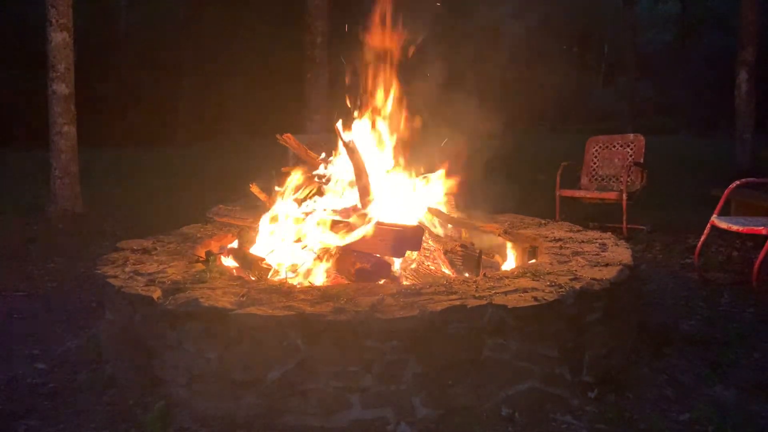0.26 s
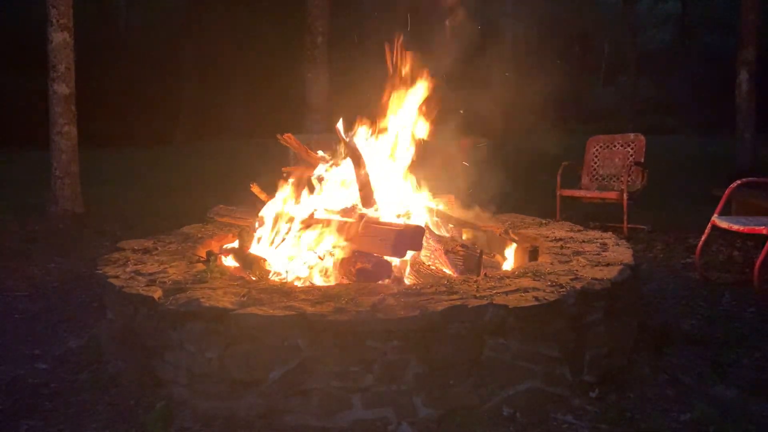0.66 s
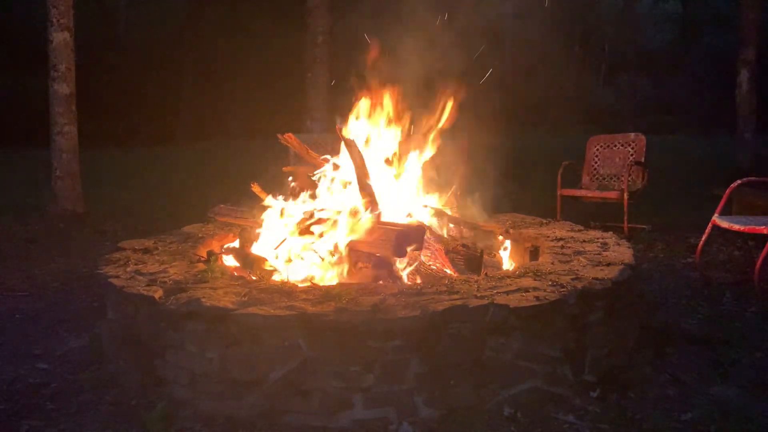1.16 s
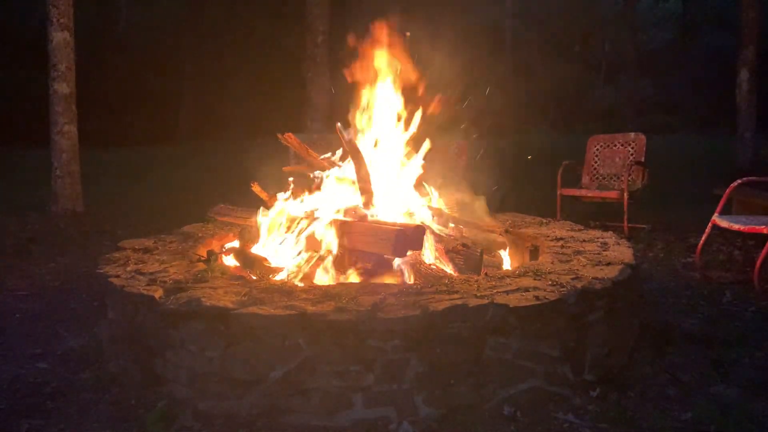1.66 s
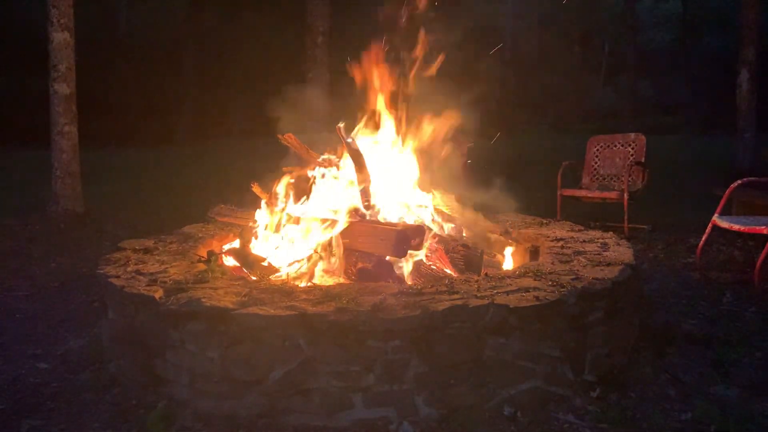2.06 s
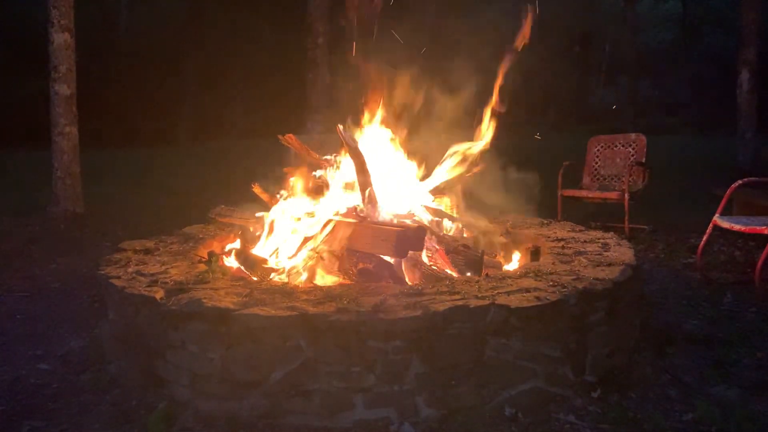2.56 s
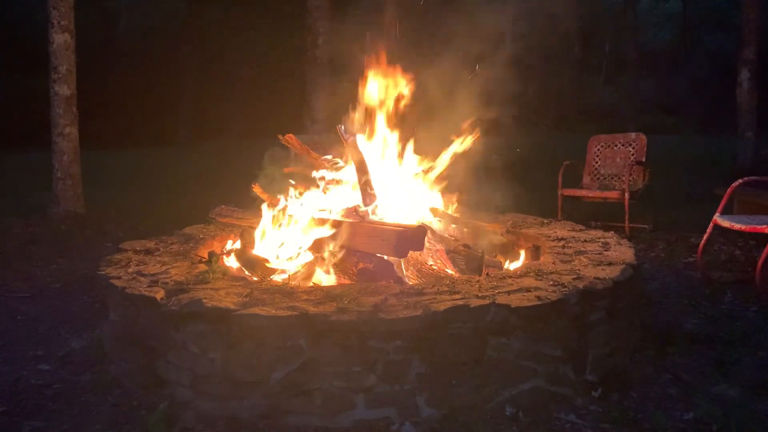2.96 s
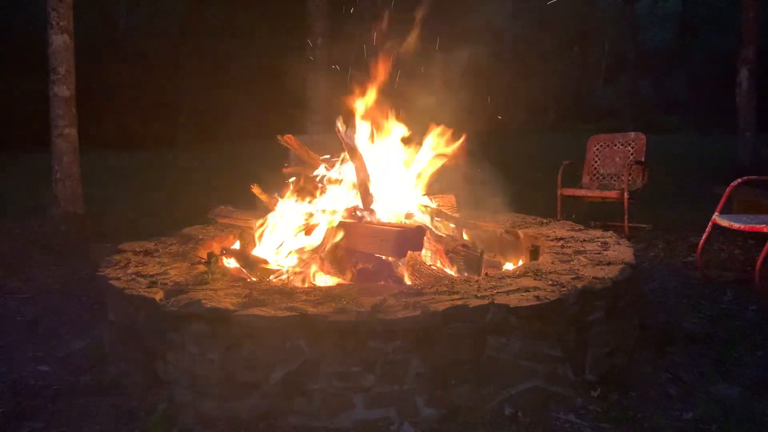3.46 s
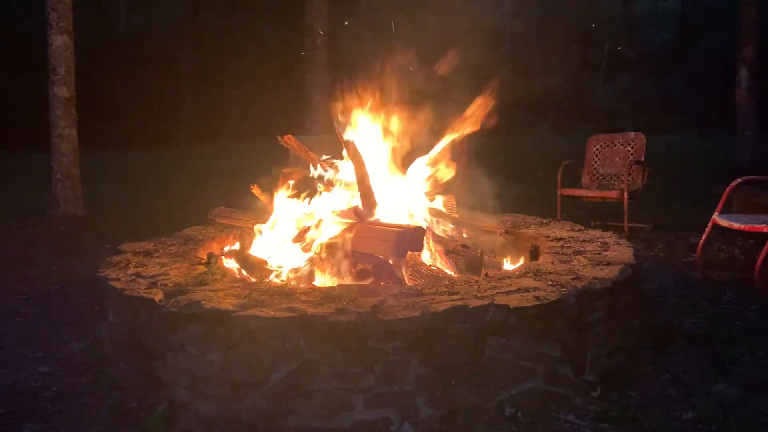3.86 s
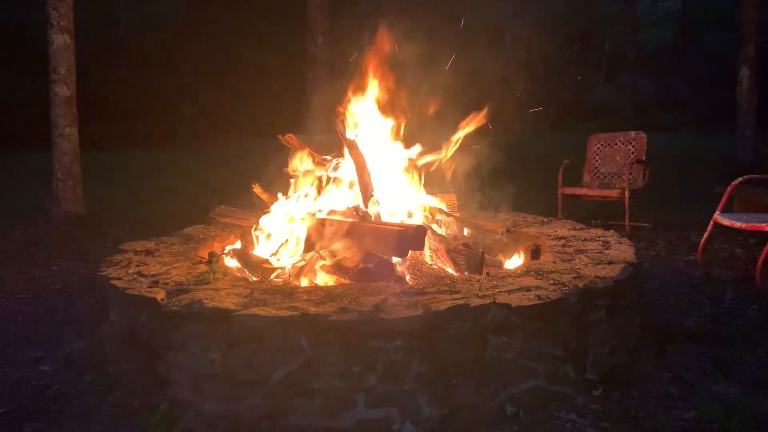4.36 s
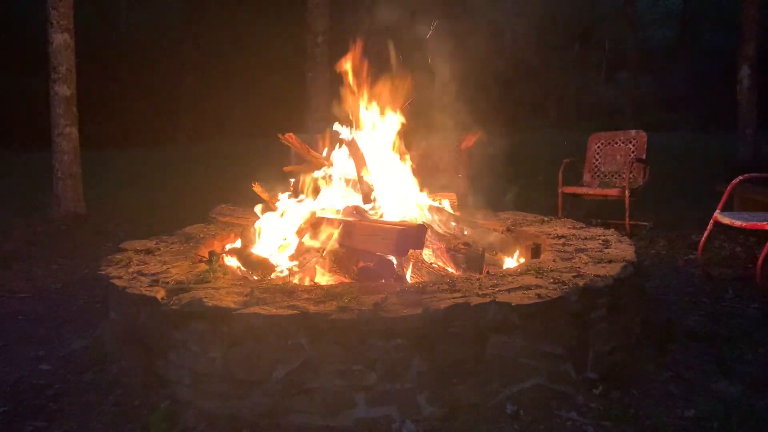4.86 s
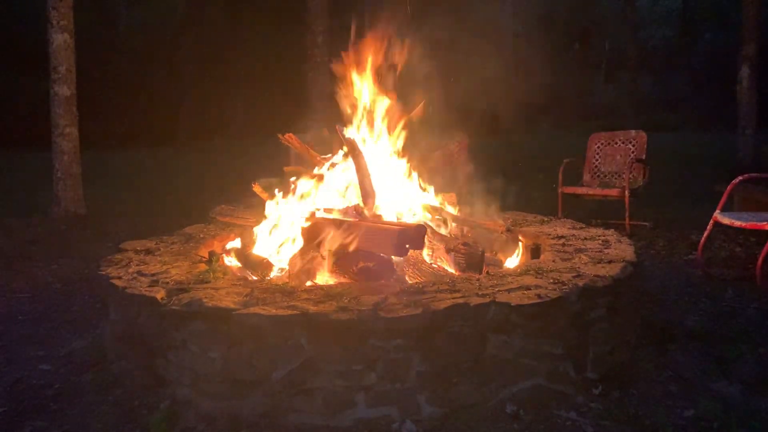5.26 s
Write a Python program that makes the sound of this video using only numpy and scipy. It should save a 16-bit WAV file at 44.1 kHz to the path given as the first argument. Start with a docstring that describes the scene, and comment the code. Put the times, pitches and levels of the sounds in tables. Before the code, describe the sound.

Outdoors at night, a log fire burns a few metres from a phone microphone. Short bright cracks with small woody knocks come irregularly, many per second, among fine ticking embers. Flames flutter softly and low, sap hisses faintly, and a thin steady cricket chorus trills all around. The sound is dry and open, with only a slight scatter from stones and trunks.

```python
"""Wood fire at night

A wood fire burns a few metres from a phone, outdoors. Sap pockets burst as short bright cracks with a woody
knock: grainy noise bursts through log resonances. Embers tick and small splits answer, as fainter bursts.
The flames flutter low and sap hisses, both as filtered noise with wandering level. Crickets trill as pulsed,
wavering tones. Stones, ground and trunks scatter the bursts; two microphone ports pick up the fire."""
import sys
import numpy as np
from scipy import signal
from scipy.fft import rfft, irfft, next_fast_len
from scipy.io import wavfile
from scipy.ndimage import uniform_filter1d

SR = 44100
rng = np.random.default_rng(int(sys.argv[2]) if len(sys.argv) > 2 else 0)


def unload_audio(sound):
    """Save the sound as a 16-bit wav file, at the path given as the first command line argument."""
    columns = np.transpose(np.atleast_2d(sound))
    # keep every value between -1 and 1, then stretch to whole-number steps
    steps = np.round(np.clip(columns, -1, 1) * 32767)
    wavfile.write(sys.argv[1], SR, steps.astype(np.int16))


def ratio(d):
    """dB to gain"""
    e = np.asarray(d, float) / 20
    return 10 ** e


N = 243431
SIZE = next_fast_len(N + 8192)
HZ = np.arange(SIZE // 2 + 1) * SR / SIZE
TIME = np.arange(N) / SR

# bursting pockets, source levels as rms over 5 ms:
# (time [s], crack [dB], knock [dB], top band [dB], length [ms])
POCKETS = [(0.0439, -39.5, -54, -49, 0.59), (0.129, -45, -50.5, -32, 1.3), (0.1549, -32.5, -48, -46, 0.43),
           (0.2386, -39, -52, -52, 0.62), (0.2436, -46, -55, -60, 2.2), (0.253, -45, -63, -44, 1.1),
           (0.2663, -37.5, -57, -49, 1.4), (0.3233, -41, -63, -40, 0.8), (0.3274, -42, -48, -39, 3.3),
           (0.3358, -41.5, -69, -33, 0.65), (0.364, -37, -51.5, -49, 0.67), (0.4, -46, -59, -41, 2.7),
           (0.457, -26, -44.5, -27, 1.05), (0.4654, -37, -55, -41, 1.4), (0.5143, -43.5, -49, -38, 1.8),
           (0.6232, -48, -54, -47, 0.49), (0.6523, -44, -52, -42, 1.3), (0.673, -36.5, -46, -27, 0.43),
           (0.6975, -43, -50, -36, 1.2), (0.7047, -37, -48, -48, 0.84), (0.7404, -33.5, -55, -43, 1.1),
           (0.7755, -37, -56, -50, 2.7), (0.7814, -39, -58, -51, 1.3), (0.8048, -31.5, -50, -38, 2.1),
           (0.896, -43, -64, -48, 1.1), (0.931, -43, -54, -35, 0.49), (0.945, -35.5, -47, -34, 1.1),
           (0.9483, -46, -46.5, -45, 2.3), (0.9903, -37, -58, -39, 0.86), (1.0086, -34.5, -44, -40, 1.1),
           (1.0227, -33, -42.5, -22, 1.14), (1.0323, -37, -53, -50, 0.91), (1.0587, -41, -52, -47, 0.77),
           (1.0644, -47, -48, -56, 3.7), (1.069, -53, -68, -55, 3.9), (1.0908, -46, -55.5, -50, 1.8),
           (1.1127, -42, -63, -39, 0.8), (1.1604, -50, -71, -39, 0.7), (1.194, -45, -72, -53, 0.6),
           (1.2978, -64, -56.5, -71, 2.4), (1.3892, -47, -54, -40, 1.7), (1.3928, -48, -41.5, -42, 1.5),
           (1.4024, -27, -40, -25, 1.06), (1.453, -40.5, -61, -42, 0.83), (1.4629, -42, -52.5, -45, 2),
           (1.4893, -37, -53, -41, 1.8), (1.5328, -30.5, -43.5, -23, 0.5), (1.5459, -42, -53, -36, 1),
           (1.5935, -28.5, -39, -27, 1.45), (1.7047, -34, -43, -32, 1.9), (1.848, -33.5, -41, -40, 1.65),
           (1.8666, -44, -52.5, -43, 0.88), (1.9073, -32.5, -56, -43, 1.2), (1.9116, -40.5, -56, -44, 1.2),
           (1.9649, -37, -54, -51, 1.5), (1.9705, -32, -38, -28, 1.55), (2.0834, -36.5, -54.5, -30, 1.1),
           (2.1256, -36.5, -49, -30, 1), (2.1604, -31, -44.5, -42, 1.5), (2.1882, -33.5, -43, -38, 0.85),
           (2.236, -37, -48, -34, 1.8), (2.242, -31, -34, -36, 1.4), (2.2775, -33, -36.5, -36, 4),
           (2.296, -38, -35.5, -35, 2.6), (2.3211, -40, -40, -37, 1.1), (2.3356, -34.5, -39.5, -41, 1.2),
           (2.3568, -32.5, -50, -43, 1.3), (2.3919, -37.5, -44, -41, 0.62), (2.528, -38.5, -43, -40, 1.4),
           (2.5718, -39, -46.5, -42, 1.7), (2.5927, -50, -63, -51, 0.7), (2.6296, -33, -38.5, -31, 2.5),
           (2.6415, -38, -44, -31, 0.81), (2.6832, -34.5, -51.5, -50, 0.9), (2.7708, -45.5, -66, -39, 0.89),
           (2.7984, -39, -61, -23.5, 0.22), (2.905, -48, -51, -63, 1.6), (2.9158, -50, -54, -55, 0.91),
           (2.9264, -25, -42, -22, 0.47), (2.963, -28, -47, -36, 1.3), (2.9717, -35, -57, -41, 2.6),
           (2.9802, -27, -40, -38, 2.4), (3.009, -33.5, -56, -50, 0.88), (3.0215, -43, -56, -48, 1.6),
           (3.0637, -27.5, -39, -20.5, 1.12), (3.143, -28, -44.5, -27, 0.83),
           (3.2136, -34.5, -51.5, -56, 0.56), (3.2855, -46, -64, -42, 1), (3.4217, -48, -57, -49, 1.0),
           (3.4288, -45, -48, -40, 1.3), (3.4367, -42, -60, -49, 0.61), (3.4482, -45, -40.5, -49, 2.1),
           (3.4554, -46, -59, -44, 1.5), (3.5088, -29.5, -45.5, -37, 0.8), (3.5235, -34.5, -36, -19, 1.33),
           (3.5971, -43, -47.5, -47, 1.4), (3.86, -40.5, -53.5, -44, 1.2), (3.9381, -30, -38, -53, 1.36),
           (3.9624, -41.5, -58, -41, 0.7), (3.9944, -39.5, -49, -41, 0.43),
           (4.0397, -35.5, -53.5, -47, 0.67), (4.1973, -48, -77, -43, 0.46), (4.2217, -38, -67, -54, 0.38),
           (4.3469, -34, -45, -30, 1.27), (4.4176, -34, -59, -59, 0.9), (4.4629, -41.5, -56, -39, 0.72),
           (4.595, -47.5, -48.5, -64, 3.3), (4.6763, -25.5, -41.5, -17, 0.64),
           (4.6876, -38, -60, -40, 0.76), (4.8193, -34.5, -56.5, -35, 0.39), (4.8318, -44, -58, -56, 1.8),
           (4.8476, -46, -50.5, -60, 1.6), (4.8707, -50.5, -58, -64, 1.6), (5.0585, -42, -50, -58, 2.4),
           (5.1487, -44, -42.5, -37, 1.4), (5.1655, -29.5, -48, -34, 1.4), (5.2287, -31.5, -40, -33, 1.2),
           (5.2513, -36, -49.5, -50, 1.0), (5.2647, -33, -43.5, -25, 1.3), (5.2798, -45, -54, -43, 1.2),
           (5.3043, -35.5, -56, -40, 1.3), (5.3734, -43.5, -72, -37, 0.59), (5.4028, -47, -57, -60, 1.1),
           (5.4202, -48.5, -53.5, -47, 2.4), (5.4858, -52.5, -59.5, -38, 1.3)]


def set_rms(x, db):
    """Scale to an rms level."""
    return x * ratio(db) / np.sqrt(np.mean(x ** 2))


def apply_gain(x, gain):
    """Filter by a gain per frequency."""
    return irfft(rfft(x, SIZE) * gain, SIZE)[..., :N]


def spectrum_gain(points):
    """Gain of a (frequency [Hz], level [dB]) spectrum, interpolated over log frequency."""
    hz, db = np.transpose(points)
    return ratio(np.interp(np.log(HZ + 1), np.log(hz), db))


def level_curve_db(points):
    """Level per sample from (time [s], level [dB]) points."""
    return np.interp(TIME, *np.transpose(points))


def band_gain(lo_hz, hi_hz, hz=HZ):
    """Soft-edged band; adjacent bands add up without a gap."""
    return 1 / (1 + (hz / hi_hz) ** 8) - 1 / (1 + (hz / lo_hz) ** 8)


def walk(rate_hz):
    """Random levels held 1 / rate_hz s and slewed twice; standard deviation 1."""
    hold = int(SR / rate_hz)
    x = np.repeat(rng.standard_normal(N // hold + 1), hold)
    x = uniform_filter1d(uniform_filter1d(x, hold), hold)[:N]
    return x / np.std(x)


def bursts(time_s, band_db, length_ms, grain_db=6., place_db=1.5):
    """Splinters of uneven size swell, die away and ring the logs; two noises per burst share one envelope."""
    # modes of the logs and the stones around them: (frequency [Hz], width [Hz], relative level [dB])
    log_modes = [(363, 64, -1.5), (608, 179, 1), (947, 340, 4), (1550, 190, -5.5), (1765, 146, -0.5),
                 (2127, 81, -2.5), (3027, 456, 4.5), (4030, 910, 4), (5700, 810, -6), (7514, 770, 6),
                 (9300, 8500, 1.5), (17200, 8800, 1.5)]
    # crack, knock, middle, top, as the rows of band_db: (low edge [Hz], high edge [Hz])
    burst_bands = [(6200, 12500), (220, 2350), (2350, 6200), (12500, 21000)]
    onset_s = .004  # lead-in of each burst window
    t = np.arange(1024) / SR
    hz = np.arange(513) * SR / 1024 + 1
    tau_s = np.clip(length_ms, .2, 5)[:, None] / 2300  # length spans 2.3 time constants
    chance = rng.standard_normal((len(time_s), 3, 1024))

    age = np.maximum((t - onset_s) / tau_s + 1.2, 0)
    envelope = age ** 2 * np.exp(-age) * ratio(grain_db * chance[:, 2])
    splinters = rfft(envelope[:, None] * chance[:, :2])

    # each spot on the pile favours other modes
    place = place_db * rng.standard_normal((len(time_s), len(log_modes), 1, 1))
    ring = 0
    for k, (mode_hz, width_hz, mode_db) in enumerate(log_modes):
        detune = (hz / mode_hz - mode_hz / hz) * mode_hz / width_hz
        ring = ring + (-1) ** k * ratio(mode_db + place[:, k]) / (1 + 1j * detune)

    sound = 0
    for (lo_hz, hi_hz), db in zip(burst_bands, band_db):
        part = irfft(splinters * ring * band_gain(lo_hz, hi_hz, hz))
        energy = np.sum(part ** 2, axis=2, keepdims=True)
        sound = sound + part * ratio(db)[:, None, None] * np.sqrt(.005 * SR / energy)  # rms over 5 ms

    at = ((time_s - onset_s) * SR).astype(int)[:, None] + np.arange(1024)
    out = np.zeros((2, N + 1024))
    for row in range(2):
        np.add.at(out[row], np.maximum(at, 0), sound[:, row])
    return out[:, :N]


def middle(crack_db, knock_db, crack_share=0.41, under_db=-2.0, scatter_db=2.0):
    """Middle-band level: weighted mean of crack and knock, offset and scattered per burst."""
    mean_db = crack_share * crack_db + (1 - crack_share) * knock_db
    return mean_db + under_db + scatter_db * rng.standard_normal(len(crack_db))


def crickets(count=16, pitch_hz=2450, spread_hz=95, waver_hz=28, pulse_hz=48, octave_db=-17):
    """Each cricket strokes a wavering note in quick pulses; all around, so each ear gets its own phases."""
    # whole chorus: (time [s], level [dB])
    chorus_points = [(0.0, -61.5), (1.1, -62.5), (2.2, -62), (2.7, -63), (3.8, -62.5), (4.8, -61),
                     (5.52, -61)]
    out = 0
    for pitch, (pace, left, right) in zip(np.linspace(-1, 1, count), rng.standard_normal((count, 3))):
        note_hz = pitch_hz + spread_hz * pitch + waver_hz * walk(30)
        phase = 2 * np.pi * np.cumsum(note_hz) / SR
        stroke_hz = pulse_hz * (1 + 0.1 * pace + 0.0621 * walk(4))
        strokes = np.maximum(np.sin(2 * np.pi * np.cumsum(stroke_hz) / SR), 0)
        ear_rad = np.array([[9 * left], [9 * right]])
        note = np.sin(phase + ear_rad) + ratio(octave_db) * np.sin(2 * phase + 3 * ear_rad)
        out = out + ratio(1.5 * walk(2.58)) * strokes * note
    return set_rms(out, 0) * ratio(level_curve_db(chorus_points))


def flames(waver_db=2.22, waver_rate_hz=11):
    """Burning gas flutters: low noise with a wandering level."""
    # flutter before the random waver: (time [s], level [dB])
    flutter_points = [(0.0, -46.5), (0.5, -43), (1.0, -47), (1.3, -43.5), (1.6, -48), (1.9, -44.5),
                      (2.15, -47), (2.5, -43.5), (3.0, -48.5), (3.5, -46), (4.0, -48), (4.5, -48),
                      (5.0, -42), (5.52, -49)]
    # relative spectrum: (frequency [Hz], density [dB per Hz])
    flutter_spectrum = [(20, -52), (40, -10), (65, 1), (110, -6), (190, -15.5), (260, -30), (600, -90)]
    noise = apply_gain(rng.standard_normal((2, N)), spectrum_gain(flutter_spectrum))
    return set_rms(noise, 0) * ratio(level_curve_db(flutter_points) + waver_db * walk(waver_rate_hz))


def sizzle(flicker_db=1.8, flicker_rate_hz=18):
    """Sap hisses out of the wood: noise whose octaves flicker apart."""
    # hiss in 2730-7740 Hz before the flicker: (time [s], level [dB])
    sizzle_points = [(0.0, -60), (0.7, -61), (1.0, -60), (2.3, -58), (2.85, -62), (3.1, -59), (4.45, -63),
                     (5.05, -61.5), (5.26, -60), (5.52, -62.5)]
    # relative spectrum: (frequency [Hz], density [dB per Hz])
    hiss_spectrum = [(150, -6.5), (350, 10.5), (500, 6.5), (800, 4), (1400, -5), (2900, 4.5), (3800, 5.5),
                     (5000, 7.5), (5900, -2.5), (7000, 5.5), (9000, -3), (12000, -2.5), (15500, -1),
                     (17000, -41)]
    noise = apply_gain(rng.standard_normal((2, N)), spectrum_gain(hiss_spectrum))
    noise = noise / np.std(apply_gain(noise, band_gain(2730, 7740)))
    hiss = 0
    for low_hz in 100 * 2 ** np.arange(8):
        octave = apply_gain(noise, band_gain(low_hz, 2 * low_hz))
        hiss = hiss + octave * ratio(flicker_db * walk(flicker_rate_hz))
    return hiss * ratio(level_curve_db(sizzle_points))


def embers(count=350, floor_db=-68, spread_db=2.5, knock_db=-14, middle_db=-9, top_db=-4):
    """Faint ticks at random moments, a few louder than most; band levels are relative to the crack."""
    moment, loudness, length = rng.random((count, 3)).T
    crack_db = floor_db - spread_db * np.log(1 - .98 * loudness)
    band_db = [crack_db, crack_db + knock_db, crack_db + middle_db, crack_db + top_db]
    return bursts(moment * N / SR, band_db, 0.38 + 0.5 * length)


def splits(count=90, lag_ms=30, crack_db=-54, knock_db=-64, top_db=-57, spread_db=5.5):
    """Small splits of the wood shortly before or, more often, after a burst pocket."""
    pick, side = rng.random((count, 2)).T
    chance = rng.standard_normal((count, 4)).T
    pocket_s = np.transpose(POCKETS)[0][(pick * len(POCKETS)).astype(int)]
    lag_s = np.sign(side - .3) * lag_ms / 1000 * np.exp(.9 * chance[0])
    time_s = np.clip(pocket_s + lag_s, 0, N / SR)
    crack, knock, top = np.reshape([crack_db, knock_db, top_db], (3, 1)) + spread_db * chance[1:]
    return bursts(time_s, [crack, knock, middle(crack, knock), top], np.full(count, 1.1))


def pops():
    """Each pocket cracks, knocks and spits in the top band with its own strengths."""
    time_s, crack, knock, top, length_ms = np.transpose(POCKETS)
    return bursts(time_s, [crack, knock, middle(crack, knock), top], length_ms)


def wood(x, scatter_db=-29, far_db=-48, dull_hz=9000):
    """Nearby stones scatter the sound within a few ms; ground and trunks add a longer, fainter, duller tail."""
    t = np.arange(8192) / SR
    decay_s = np.reshape([.002, .035], (2, 1, 1))  # near, far time constants
    near, far = rfft(rng.standard_normal((2, 2, 8192)) * np.exp(-t / decay_s), SIZE)
    return apply_gain(x, 1 + ratio(scatter_db) * near + ratio(far_db) * far / (1 + 1j * HZ / dull_hz))


def ports(front):
    """Both ports share the first signal with lag and shading; the right mixes in the second, most mid-band."""
    # microphone ports: (frequency [Hz], left lead [rad], left minus right [dB], shared part [0-1])
    port_points = [(0, 0, 0, .98), (300, .1, -.5, .93), (1200, .7, 0, .97), (1900, 1.5, -1, .7),
                   (2900, 1.5, 0, .8), (3600, 2.9, -2.5, .8), (4300, 3.5, -4, .6), (5200, 2.3, -7, .5),
                   (6000, 2.0, -7, .5), (6900, -1.26, -.5, .9), (7500, -2.0, 0, .985),
                   (22050, -20.5, 0, .985)]
    hz, *columns = np.transpose(port_points)
    lead_rad, balance_db, shared = (np.interp(HZ, hz, column) for column in columns)
    first, second = rfft(front, SIZE)
    left = first * ratio(balance_db / 2) * np.exp(.5j * lead_rad)
    right = shared * first + np.sqrt(1 - shared ** 2) * second
    right = right * ratio(-balance_db / 2) * np.exp(-.5j * lead_rad)
    return irfft(np.array([left, right]), SIZE)[:, :N]


def scene():
    """The fire in front through both ports, crickets around."""
    fire = wood(pops() + splits() + embers()) + flames() + sizzle()
    return ports(fire) + crickets()


def top_cut(x):
    """Nothing passes above the cut-off."""
    return signal.sosfilt(signal.butter(12, 17310, fs=SR, output="sos"), x)


def record(dry):
    """The phone cuts the top with a steep elliptic low-pass."""
    top_hz, ripple_db, stop_db = 15760, .5, 60
    low_pass = signal.ellip(6, ripple_db, stop_db, top_hz, fs=SR, output="sos")
    return top_cut(signal.sosfilt(low_pass, dry))


dry = scene()
out = record(dry)
unload_audio(out)
```